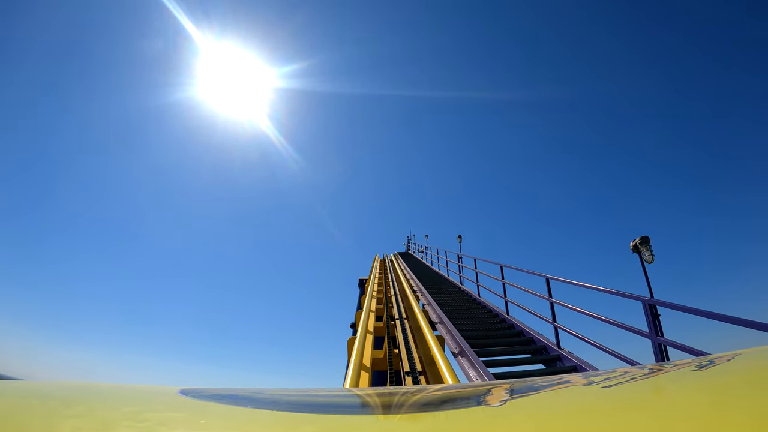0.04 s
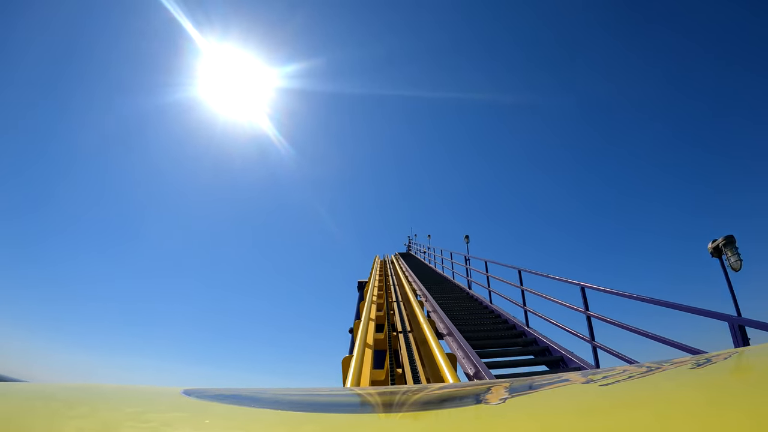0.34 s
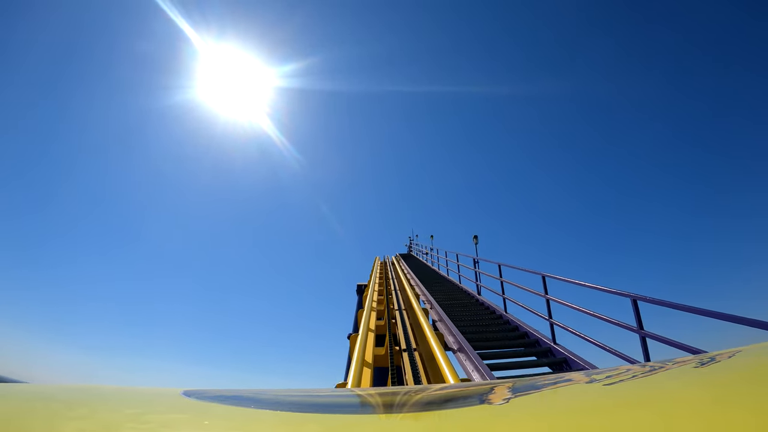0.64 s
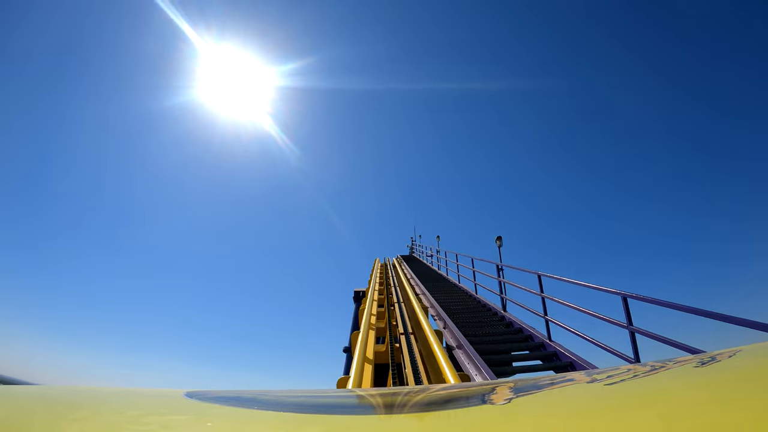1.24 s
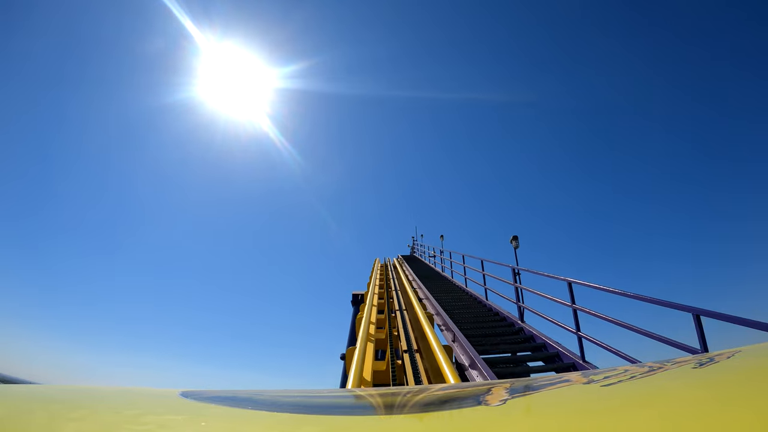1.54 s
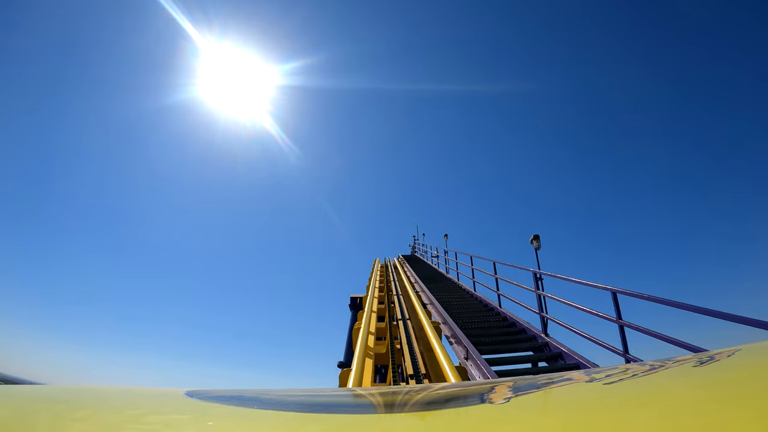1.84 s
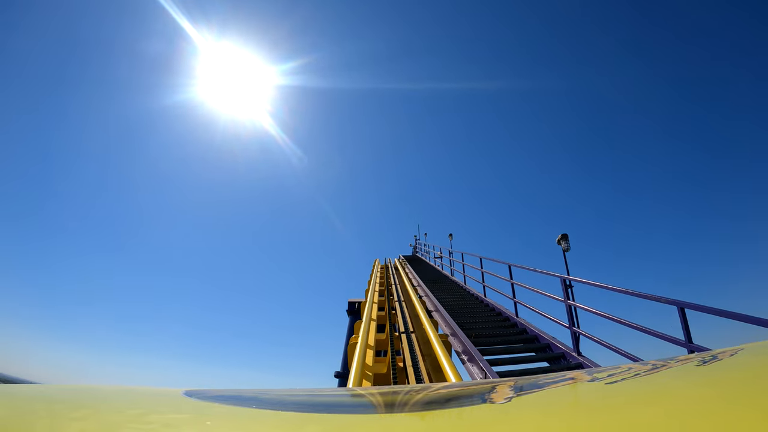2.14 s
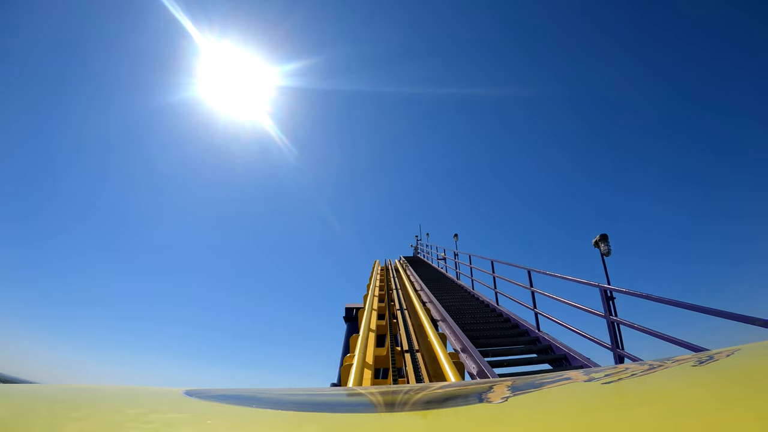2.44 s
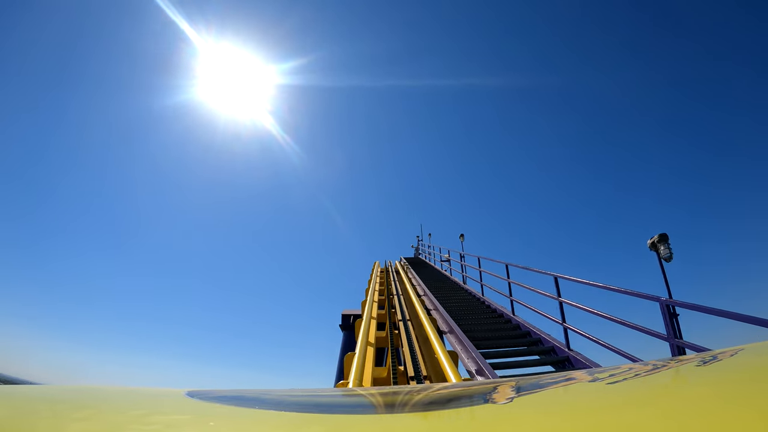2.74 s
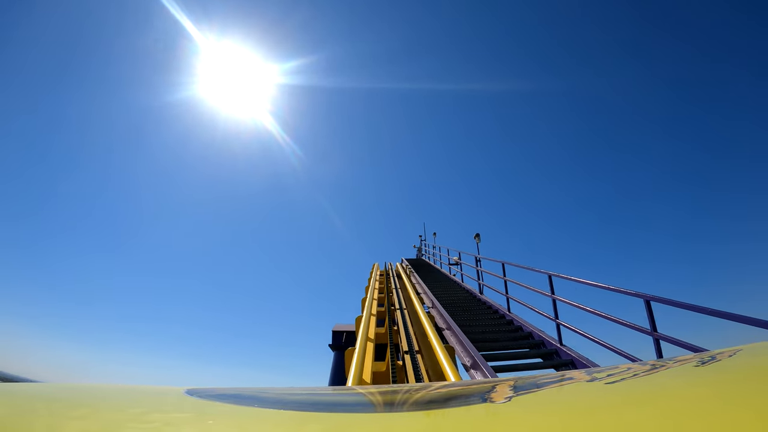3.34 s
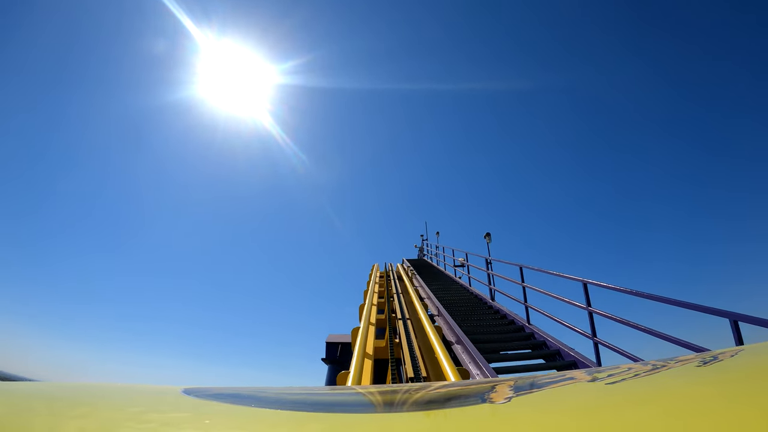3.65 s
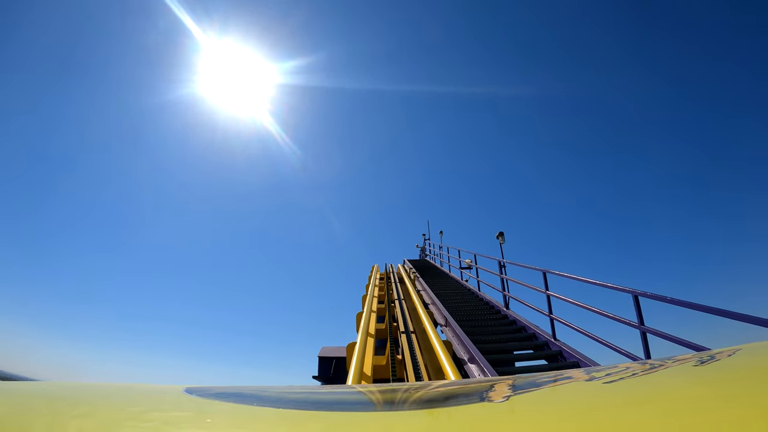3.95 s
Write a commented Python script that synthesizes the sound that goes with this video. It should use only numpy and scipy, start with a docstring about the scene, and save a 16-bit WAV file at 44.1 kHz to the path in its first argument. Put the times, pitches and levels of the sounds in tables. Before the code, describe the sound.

Rapid metallic clacking of a roller coaster climbing its lift hill, with low rumble and wind.

```python
"""On the lift hill of a roller coaster, at the nose of a car being hauled up.
The lift chain and safety catch clatter about 25 times a second, in fits at first, then steadily,
ringing the steel; now and then the catch clinks squarely on a tooth. The wheels thud along the
track and boom in the car's shell, and jolts thump its hollow panels. The lift's drive hums,
the chain scrapes in its trough and wind buffets the microphone."""
import sys
import numpy as np
from scipy import signal
from scipy.fft import rfft, irfft
from scipy.io import wavfile
from scipy.ndimage import uniform_filter1d, minimum_filter1d

SR = 44100
rng = np.random.default_rng(int(sys.argv[2]) if len(sys.argv) > 2 else 0)


def wav_out(sig):
    """Save sig, one row per channel (or a flat mono array), as 16-bit PCM at SR to the path in sys.argv[1]."""
    wavfile.write(sys.argv[1], SR, np.round(np.clip(np.atleast_2d(sig).T, -1, 1) * 32767).astype(np.int16))


N = 176400
TIME_S = np.arange(N) / SR
CONTACTS_PER_S, CONTACT_SCATTER_DB = 2500, -0.5


def undb(db):
    return 10 ** (np.asarray(db) / 20)


def level(x, rms_db):
    return x * undb(rms_db) / np.sqrt(np.mean(x ** 2))


def through(x, response):
    """Filter by a complex response, a function of Hz."""
    size = 2 ** 18
    grid_hz = np.arange(size // 2 + 1) * SR / size
    return irfft(rfft(x, size) * response(grid_hz))[:N]


def colour(x, points):
    """Minimum-phase filter through (frequency [Hz], gain [dB]) points."""
    hz, db = np.array(points, float).T

    def response(f):
        gain = undb(np.interp(np.log(f + 1), np.log(hz), db))
        cepstrum = irfft(np.log(gain))
        half = len(cepstrum) // 2
        cepstrum[1:half] *= 2
        cepstrum[half + 1:] = 0
        return np.exp(rfft(cepstrum))
    return through(x, response)


def ring(x, modes):
    """Parallel bank of damped resonances."""
    return through(x, lambda f: sum(undb(db) * 1j * f * width / (hz ** 2 - f ** 2 + 1j * f * width)
                                    for hz, width, db in modes))


def walk(rate_hz):
    """Smooth random wander, unit spread."""
    knots = rng.standard_normal(1024)
    wander = np.interp(TIME_S * rate_hz, np.arange(len(knots)), knots)
    wander = uniform_filter1d(wander, int(SR / rate_hz / 2))
    return wander / wander.std()


def impacts(per_s, scatter_db):
    """Randomly timed impulses of uneven strength."""
    hits = (rng.random(N) < per_s / SR) * rng.choice([-1, 1], N)
    return hits * undb(scatter_db * np.clip(rng.standard_normal(N), -2, 2))


def strike(start_s, hz, db, rise_s, decay_s):
    """One blow: tones weighted by db swell and decay."""
    age_s = np.arange(SR // 4) / SR
    gains = undb(db) / np.linalg.norm(undb(db))
    tones = sum(gain * np.sin(2 * np.pi * (f * age_s + rng.random())) for f, gain in zip(hz, gains))
    envelope = (1 - np.exp(-(age_s / rise_s) ** 2)) * np.exp(-age_s / decay_s)
    return np.pad(tones * envelope, (int(start_s * SR), N))[:N]


def clack_envelope(starts_s, levels_db):
    """Each clack swells, holds and dies; loose links chatter on."""
    attack_s, hold_s, release_s = .008, .015, .013
    chatter_s, chatter_db = .04, -3
    power = np.zeros(N)
    for start_s, db in zip(starts_s, levels_db):
        first = max(int((start_s - attack_s) * SR), 0)
        span = slice(first, first + SR // 2)
        age_s = TIME_S[span] - start_s
        rise = np.clip(age_s / attack_s + .5, 0, 1)
        fall = np.exp(-np.maximum(age_s - hold_s, 0) / release_s)
        chatter = undb(chatter_db) * np.exp(-np.maximum(age_s, 0) / chatter_s)
        power[span] += (undb(db) * rise * (fall + chatter)) ** 2
    return np.sqrt(power)


# chain and catch clacks (time [s], relative clank level [dB], relative crack level [dB])
CLACK_HITS = [(0.01, -27, -33.5), (0.044, -23.5, -27), (0.087, -31, -39), (0.123, -26, -29.5),
              (0.155, -27.5, -41.5), (0.204, -25.5, -50), (0.277, -28.5, -30.5), (0.333, -28, -36),
              (0.369, -24.5, -28), (0.403, -29, -30.5), (0.506, -27, -36), (0.627, -31.5, -49),
              (0.654, -29, -47.5), (0.696, -27.5, -30.5), (0.721, -24, -34.5), (0.768, -25.5, -33),
              (0.805, -31.5, -32), (0.965, -26.0, -29.5), (1.134, -35, -42.5), (1.232, -26.5, -31.5),
              (1.292, -24.5, -34), (1.328, -31.5, -25.5), (1.474, -32.5, -63), (1.513, -28, -33),
              (1.57, -25, -33.5), (1.602, -24, -30), (1.653, -27, -35), (1.693, -27, -28),
              (1.731, -31.5, -37.5), (1.78, -31, -47.5), (1.813, -24.5, -29.5), (1.857, -29.5, -43),
              (1.894, -28, -29.5), (1.928, -24.5, -28), (1.979, -38, -28.5), (2.01, -25.5, -31.5),
              (2.058, -27.5, -39), (2.095, -32, -26), (2.138, -25.5, -39.5), (2.177, -23, -29.5),
              (2.216, -25.5, -35.5), (2.249, -26, -31), (2.289, -30.5, -43), (2.336, -27, -42.5),
              (2.376, -28.5, -46.5), (2.413, -23.5, -28), (2.454, -29, -30), (2.496, -27.5, -28.5),
              (2.534, -27.5, -31.5), (2.573, -26.5, -40), (2.599, -27.5, -35), (2.652, -23.5, -33.5),
              (2.69, -27, -34.5), (2.772, -26, -30), (2.81, -26, -28), (2.861, -26.5, -29),
              (2.896, -30, -30.5), (2.933, -31.5, -26), (2.975, -36, -42), (3.017, -29, -36),
              (3.061, -29.5, -33), (3.096, -29, -26.5), (3.142, -24, -29), (3.174, -27, -25.5),
              (3.228, -24.5, -32.5), (3.254, -26, -33.5), (3.33, -23.5, -30), (3.375, -25, -28.5),
              (3.418, -26, -25), (3.46, -25, -32), (3.535, -26, -28), (3.581, -28, -40),
              (3.621, -22.5, -32), (3.659, -27, -31.5), (3.702, -24, -37), (3.743, -25, -36.5),
              (3.762, -33.5, -29.5), (3.787, -29.5, -41), (3.924, -56.5, -44.5), (3.991, -36.5, -65)]
# clack spectrum (frequency [Hz], gain [dB])
CLACK_EQ = [(250, -22), (450, 9), (700, 0), (1900, -0.5), (2150, -11), (3200, -5.5), (4400, -18.5),
            (5600, -19), (6400, -27.5), (8000, -31.5), (10500, -50.5), (15000, -69)]
# steel resonances (frequency [Hz], width [Hz], gain [dB])
STEEL_RESONANCES = [(715.8, 15.4, -3), (846, 32, -8), (907, 5.1, -3.5), (1180, 7.8, -7), (1221, 18, -4.5),
                    (1296, 63, -1.5), (1400, 17.3, 3.5), (1516, 31, -2), (1659, 15, 1), (1830, 66, -0.5),
                    (2325, 12, -1.5), (2483, 120, -6.5)]


def clatter():
    """Each clack is a burst of metal contacts that cracks and rings the steel."""
    crossover_hz, crack_boost_db = 2220, 5
    starts_s, clank_db, crack_db = np.array(CLACK_HITS).T
    clank = clack_envelope(starts_s, clank_db)
    crack = clack_envelope(starts_s, crack_db + crack_boost_db)

    def lowpass(f):
        return 1 / (1 + (f / crossover_hz) ** 4)

    def force():
        hits = impacts(CONTACTS_PER_S, CONTACT_SCATTER_DB)
        return through(hits * clank, lowpass) + through(hits * crack, lambda f: 1 - lowpass(f))
    steel = ring(force(), STEEL_RESONANCES)
    steel = colour(steel, [(300, 0.5), (700, 12.0), (1900, 2.5), (3200, -4.5), (15000, -60.5)])
    clacks = colour(force(), CLACK_EQ)
    return level(clacks, -31) + level(steel, -28.5)


# wheel load (time [s], boom and roll gain [dB], panel and knock gain [dB])
WHEEL_LOAD = [(0.0, -21.5, -27), (0.3, -21, -20.5), (0.5, -25, -29.5), (0.82, -21.5, -26),
              (1.44, -26, -34.5), (1.54, -22, -25.5), (3.77, -22, -24.5), (3.92, -26, -42.5),
              (4.0, -32, -33)]
# shell and panel resonances (frequency [Hz], width [Hz], gain [dB])
SHELL_RESONANCES = [(80, 10, 2), (98.7, 8.4, 3.5), (152.7, 9.5, -8.5), (200, 15.3, -2)]
PANEL_RESONANCES = [(258, 4.6, 1.5), (323.5, 27, -1), (372.2, 15.5, 3.5), (412.8, 12.2, 4.5),
                    (473.8, 29.7, 7), (512, 29, -6), (616, 41, -9)]
# rolling and knocking spectra (frequency [Hz], gain [dB])
ROLL_EQ = [(40, -37), (65, -2), (110, -1.5), (170, -3.5), (240, -14.5), (350, -15), (600, -39.5),
           (1200, -42)]
KNOCK_EQ = [(120, -21.5), (220, 8), (500, -2), (750, -2.5), (1100, -32), (2000, -15)]


def wheels():
    """Wheels thud over the track: the shell booms and its panels knock."""
    times_s, low_db, mid_db = np.array(WHEEL_LOAD).T
    boom = level(ring(impacts(per_s=400, scatter_db=-0.5), SHELL_RESONANCES), 0.5)
    roll = level(colour(impacts(per_s=350, scatter_db=3.0), ROLL_EQ), -1)
    panels = level(ring(impacts(per_s=300, scatter_db=2.0), PANEL_RESONANCES), -1)
    knocks = level(colour(impacts(per_s=160, scatter_db=3.5), KNOCK_EQ), -5)
    low = (boom + roll) * undb(np.interp(TIME_S, times_s, low_db))
    mid = (panels + knocks) * undb(np.interp(TIME_S, times_s, mid_db))
    return (colour(low, [(200, 2.5), (400, -1.5), (900, -7.0), (12000, -76)])
            + colour(mid, [(700, 2.0), (1200, -3.0), (3000, -18), (9000, -68.5)]))


def drive():
    """The lift's drive hums through the track, wavering and throbbing."""
    hum_hz, waver, throb_db = 96.2, 0.0284, 2
    cycles = np.cumsum(hum_hz * (1 + waver * walk(rate_hz=10))) / SR
    throb = undb(throb_db * walk(rate_hz=14))
    return level(np.sin(2 * np.pi * cycles) * throb, -25)


# chain scrape in the trough (time [s], relative level [dB])
CHAIN_SCRAPE = [(0.0, -42), (0.399, -47), (0.48, -53), (0.6, -57.5), (0.8, -42), (0.92, -53.5),
                (1.0, -50.5), (1.1, -54), (1.19, -57), (1.34, -38), (1.45, -55), (1.578, -44), (2.74, -47),
                (2.9, -42.5), (3.779, -45), (3.86, -54), (4.0, -59.5)]
# scrape spectrum (frequency [Hz], gain [dB])
SCRAPE_EQ = [(400, -1), (1600, -1.5), (2100, -9), (3000, -8.5), (5500, -23.5), (8000, -34.5),
             (15000, -62.5)]


def chain():
    """The chain scrapes along its trough, harder when taut; loose links tinkle."""
    link_hz, link_width_hz, links_per_s = 3080, 220, 110
    flicker_db = 3.3 * walk(rate_hz=35)
    times_s, db = np.array(CHAIN_SCRAPE).T
    scrape = undb(np.interp(TIME_S, times_s, db) + flicker_db)
    rasp = colour(impacts(CONTACTS_PER_S, CONTACT_SCATTER_DB) * scrape, SCRAPE_EQ)
    link_hits = impacts(links_per_s, CONTACT_SCATTER_DB) * scrape ** .7
    link_mode = [(link_hz, link_width_hz, 0)]
    tinkle = ring(ring(link_hits, link_mode), link_mode)
    return level(rasp, -30.5) + level(tinkle, -48.5)


# buffeting spectrum (frequency [Hz], gain [dB])
WIND_EQ = [(15, -6), (35, 12), (65, 6), (140, -13.5), (400, -30)]


def wind():
    """Gusts buffet the microphone."""
    gust_db, cutoff_hz = 1.5, 500
    air = colour(rng.standard_normal(N), WIND_EQ) * undb(gust_db * walk(rate_hz=4.8))
    lowpass = signal.butter(2, cutoff_hz, fs=SR, output="sos")
    return level(signal.sosfilt(lowpass, air), -26)


# catch landings (time [s], relative level [dB])
CATCH_LANDINGS = [(0.368, -22.5), (0.718, -27), (1.299, -22.5), (1.330, -21), (1.613, -22), (1.694, -30),
                  (1.815, -28), (2.09, -31.5), (2.137, -32), (2.175, -30), (2.254, -28.5), (2.413, -26.5),
                  (2.454, -27), (2.534, -28), (2.658, -28), (2.778, -24.5), (2.814, -22), (3.1, -33),
                  (3.177, -24.5), (3.378, -23.5), (3.417, -27), (3.62, -26)]
# catch and link resonances (frequency [Hz], width [Hz], gain [dB])
CATCH_RESONANCES = [(2838, 60, 6.5), (3063, 36, -1), (3260, 76, -9), (4110, 210, -11.5), (5124, 130, -17),
                    (5630, 35, -26)]


def catch_clinks():
    """The catch lands squarely on a tooth; each landing rings its modes in a different mix."""
    scatter_db = 2.6
    hz, width_hz, mode_db = np.array(CATCH_RESONANCES).T
    clinks = np.zeros(N)
    for start_s, db in CATCH_LANDINGS:
        detune, mix = rng.standard_normal((2, len(hz)))
        tones_hz = hz + detune * width_hz / 2
        tones_db = mode_db + scatter_db * mix
        clinks += undb(db) * strike(start_s, tones_hz, tones_db, rise_s=.0045, decay_s=.005)
    return level(clinks, -41.2)


# jolts of the car's body (time [s], relative level [dB], pitch [Hz])
JOLTS = [(0.535, -5, 345), (0.75, -1.5, 203), (0.836, -7.5, 433), (0.921, -3.5, 257), (0.968, -4.5, 532),
         (3.895, 1, 160)]


def panel_thumps():
    """Each jolt of the car sounds one hollow panel."""
    thumps = sum(undb(db) * strike(start_s, [hz], [0], rise_s=.007, decay_s=.022)
                 for start_s, db, hz in JOLTS)
    return level(thumps, -36)


def scene():
    """Mono sum of all sources."""
    return (clatter() + catch_clinks() + wheels() + panel_thumps() + drive() + chain() + wind())[None]


def record(dry):
    """The camera's limiter holds down peaks; a low-pass cuts the top."""
    ceiling_db, window_samples, cutoff_hz = -4.2, 700, 15700
    gain = np.minimum(1, undb(ceiling_db) / (np.abs(dry) + 1e-9))
    gain = uniform_filter1d(minimum_filter1d(gain, window_samples), window_samples)
    lowpass = signal.ellip(8, .2, 70, cutoff_hz, fs=SR, output="sos")
    return signal.sosfilt(lowpass, dry * gain)


dry = scene()
out = record(dry)
wav_out(out)
```